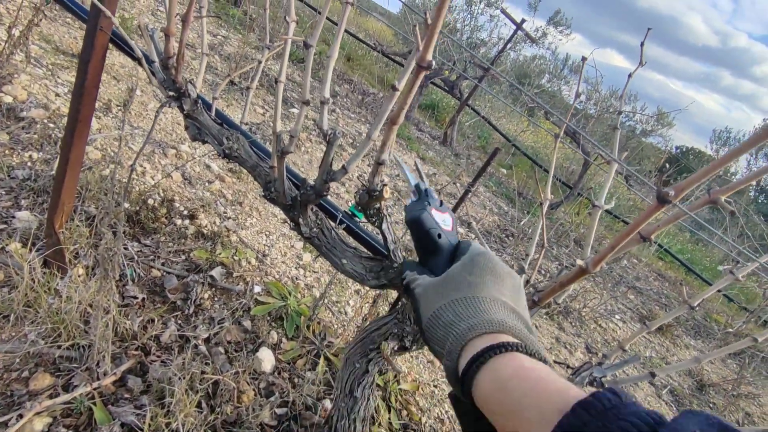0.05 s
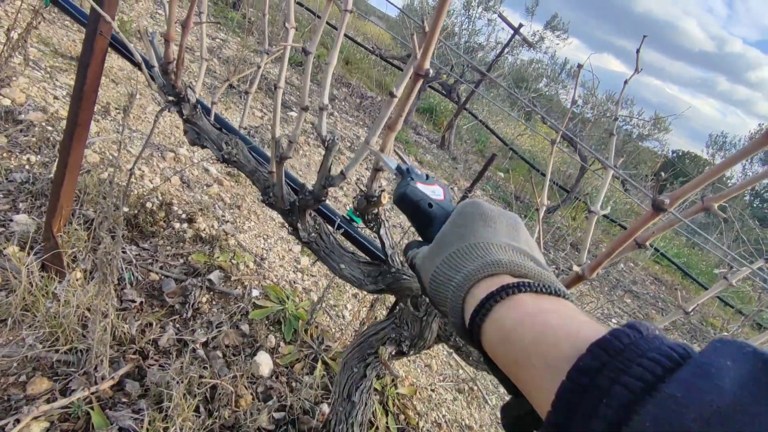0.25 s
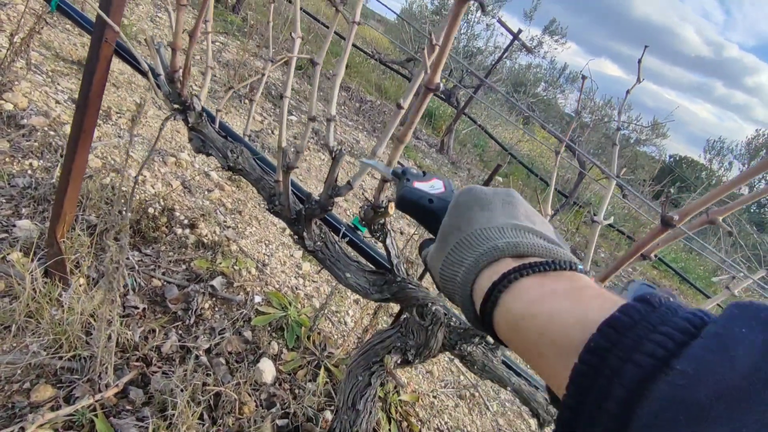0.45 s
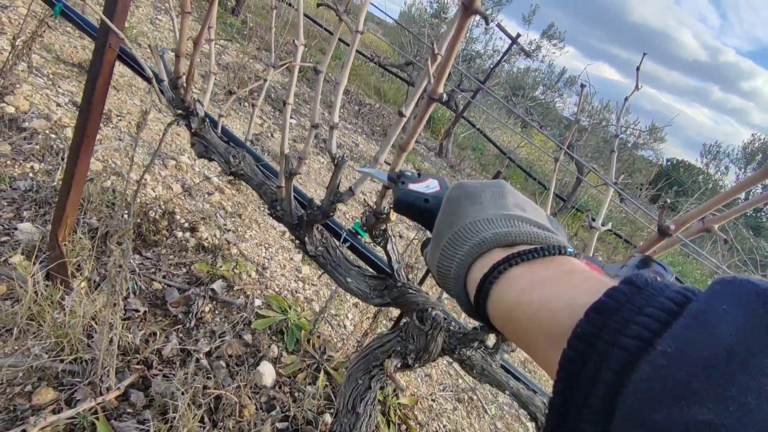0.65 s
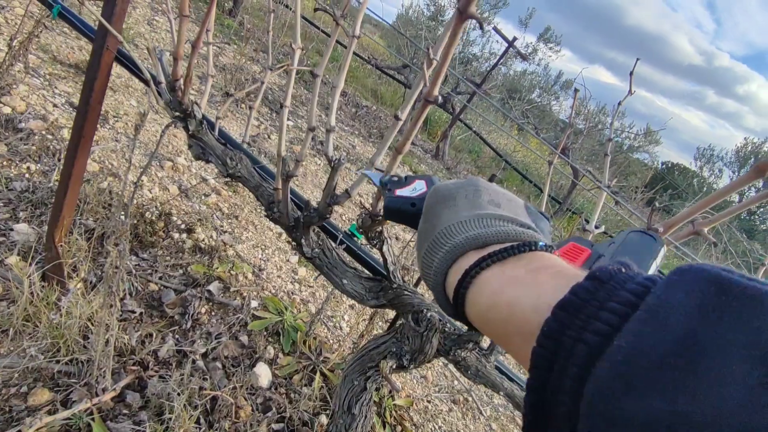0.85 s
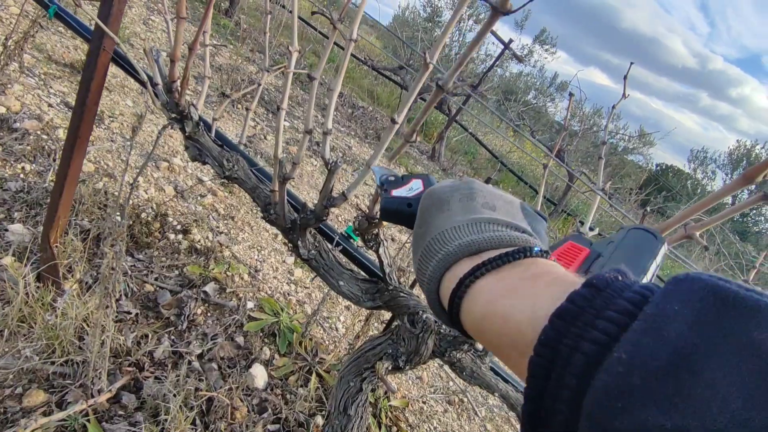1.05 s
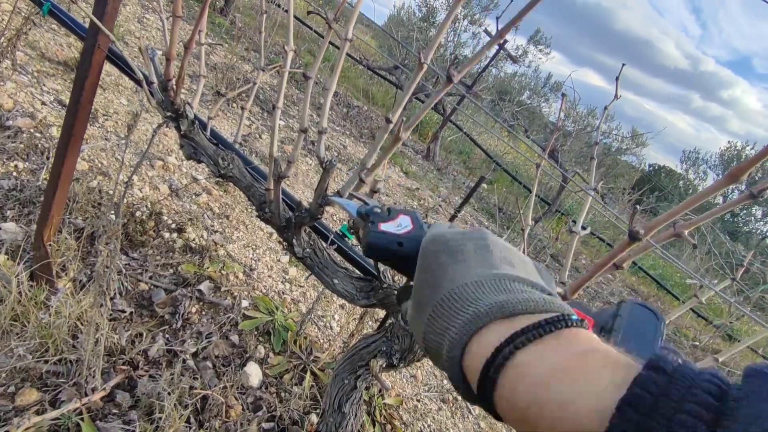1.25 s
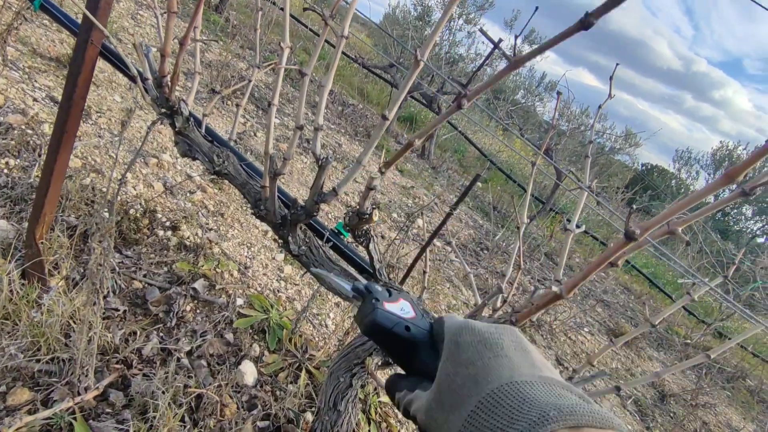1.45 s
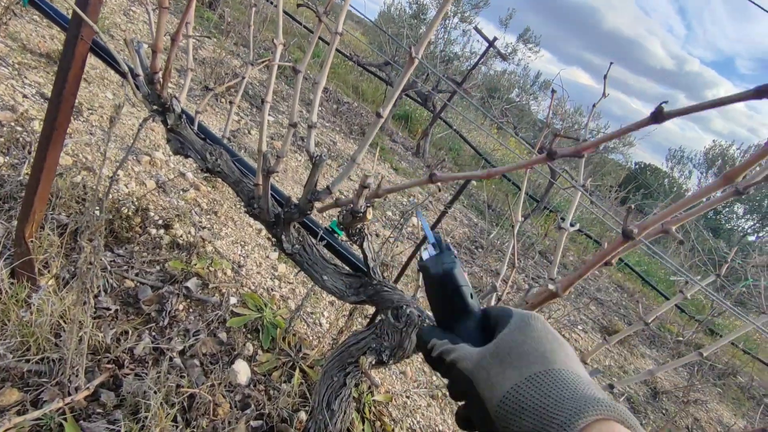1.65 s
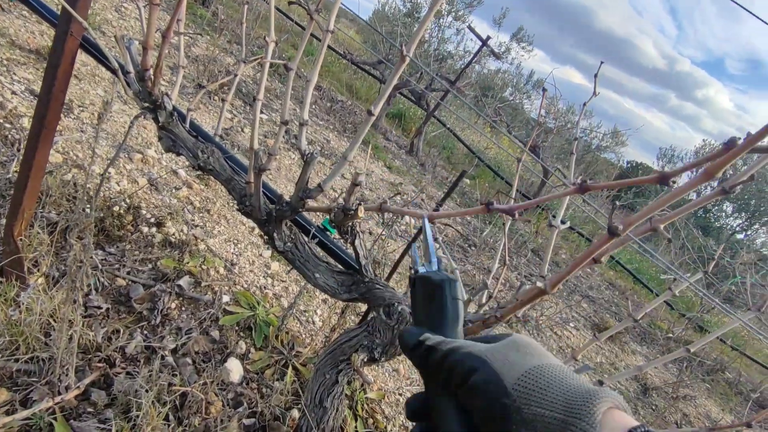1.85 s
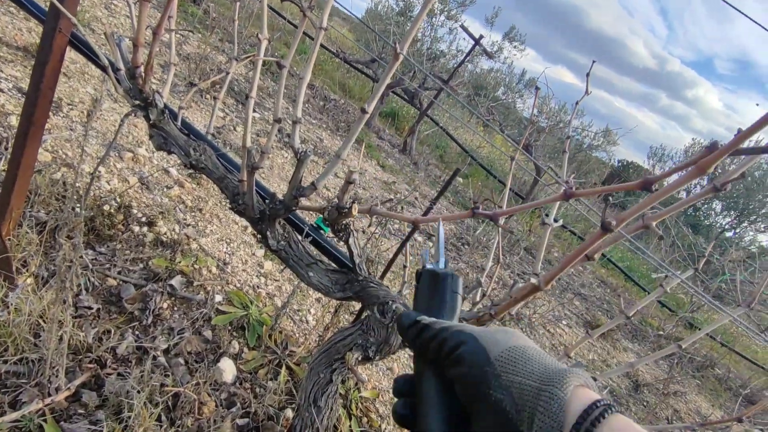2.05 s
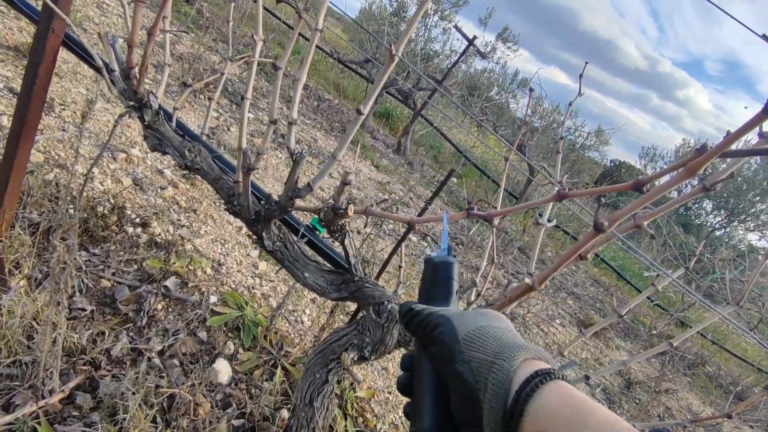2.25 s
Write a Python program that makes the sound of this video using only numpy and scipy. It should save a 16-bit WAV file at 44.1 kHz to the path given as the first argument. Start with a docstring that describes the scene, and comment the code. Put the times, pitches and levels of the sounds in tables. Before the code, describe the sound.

Electric pruning shears make one cut near the microphone after a moment of light outdoor wind and faint, distant birds. The motor whirs, wood snaps, a second whir reopens the blade, and twigs click and rustle softly.

```python
"""First, dry grass swishes, light wind bumps the microphone and birds call far away in a vineyard.
Close by, battery pruning shears start with a clack: the geared motor spins up, labours through a
vine cane until it snaps, then runs back to open the blade. The cut cane ticks and scrapes against
its neighbours, and a sleeve rubs softly as the arm draws back."""
import sys
import numpy as np
from scipy import signal
from scipy.fft import rfft, irfft, next_fast_len
from scipy.io import wavfile
from scipy.ndimage import map_coordinates

SR = 44100
rng = np.random.default_rng(int(sys.argv[2]) if len(sys.argv) > 2 else 0)


def unload_wav(signal):
    """Save mono or channel-first audio to the path in sys.argv[1] as 16-bit WAV at rate SR, clipped to [-1, 1]."""
    wavfile.write(
        sys.argv[1],
        SR,
        np.round(np.clip(np.atleast_2d(signal).T, -1, 1) * 32767).astype(np.int16),
    )


N = 101429
T = np.arange(N) / SR


def amp(db):
    """Turn decibels into a gain."""
    return 10 ** (np.asarray(db) / 20)


def unit(x):
    """Scale to an average strength (rms) of 1."""
    return x / np.sqrt(np.mean(x ** 2) + 1e-20)


def along(points, hz):
    """Read between (f/Hz, value) points on a log frequency axis."""
    f, v = np.transpose(points)
    return np.interp(np.log(hz + 1), np.log(f + 1), v)


def curves(rows):
    """One value per sample for each column after the time."""
    s, *cols = np.transpose(rows)
    return [np.interp(T, s, c) for c in cols]


def wobble(rate):
    """A smooth curve through `rate` random values a second."""
    return map_coordinates(rng.standard_normal(4096), [T * rate], mode="wrap")


def filtered(x, response):
    """Scale each frequency in x by response(hz)."""
    m = next_fast_len(N + 8192)
    return irfft(rfft(x, m) * response(np.fft.rfftfreq(m, 1 / SR)), m)[..., :N]


def pan(db):
    """Left and right gains; a positive pan is louder on the left."""
    return amp(np.array([[.5], [-.5]]) * db)


def noise(spectrum, alike, balance=((100, 0), (10000, 0)), drive=1):
    """Stereo noise of rms 1, roughened by drive, then coloured. Likeness 1 is the same in both ears."""
    def colour(hz):
        turn = np.arccos(np.clip(along(alike, hz), -1, 1)) / 2
        return amp(along(spectrum, hz)) * [np.cos(turn), np.sin(turn)]
    mid, side = filtered(rng.standard_normal((2, N)) * drive, colour)
    return unit(filtered(np.array([mid + side, mid - side]), lambda hz: pan(along(balance, hz))))


def burst(s, length, ring=0.013, attack=0.00068):
    """Rise at time s, hold while the contact lasts, then fall 60 dB in `ring` seconds."""
    rise = np.clip((T - s) / attack, 0, 1)
    return rise * np.exp(-np.log(1000) * np.clip((T - s - length) / ring, 0, 10))


def blow(db, envelope, carrier):
    """A short hit of noise whose energy does not depend on chance."""
    return amp(db) * unit(envelope * carrier) * np.sqrt(np.mean(envelope ** 2))


def tones(orders, angle, rough, shimmer_db=2):
    """Slightly unsteady tones at multiples of the shaft speed."""
    return sum(np.sqrt(2) * amp(db + shimmer_db * wobble(69.9)) * pan(lr)
               * np.sin(k * angle + rough * wobble(160)) for k, db, lr in orders)


# How loud the grass is: t/s, level/dB
GRASS_SWISH = [(0, -70), (.018, -58), (.045, -64), (.095, -77), (.11, -72), (.125, -77.5), (.3, -93),
               (.5, -110)]
# Its tone colour: f/Hz, level/dB
GRASS_COLOUR = [(1500, -12), (4000, -9.5), (6500, -3), (8200, 1), (10000, -17), (13500, -2), (15500, -14)]
def grass():
    """Dry grass gives a brief, grainy swish."""
    grain = amp(3.8 * wobble(1100))
    return amp(curves(GRASS_SWISH)[0]) * noise(GRASS_COLOUR, [(1000, 0.32), (10000, .1)], drive=grain)


# Strength of the gusts: t/s, level/dB
GUSTS = [(0.0, -58), (0.07, -58), (0.1, -42.5), (0.17, -57.5), (0.22, -42.5), (0.27, -36.5), (0.34, -45.5),
         (0.94, -51), (0.99, -46.5), (1.06, -56), (1.5, -53), (1.54, -38.5), (1.66, -53.5), (1.76, -44.5),
         (1.81, -57.5), (1.98, -41), (2.28, -56), (2.3, -78)]
# The side they hit: t/s, pan/dB
GUST_PAN = [(0, 8), (.26, -19.5), (.5, -3), (.8, 1.5), (1.5, 5), (1.62, 9.5), (1.85, -8.5), (2.3, 11.5)]
# Sudden bumps of air: t/s, length/s, level/dB, pan/dB
BUMPS = [(0.209, 0.015, -40.5, -19), (0.249, 0.042, -36.5, -20), (0.614, 0.029, -44, -7.5),
         (0.717, 0.047, -45.5, -2), (1.581, .025, -42.5, 9.5), (1.969, 0.042, -47.5, -1)]
# Tone colours of gusts, bumps and open air: f/Hz, level/dB
GUST_COLOUR = [(20, 2), (45, 3.5), (90, -2), (150, -14.5), (300, -27.5), (500, -51.5), (1200, -77.5),
               (4000, -118)]
BUMP_COLOUR = [(25, -4), (60, -4), (95, 5), (140, -4), (220, -14.5), (330, -25), (600, -42.5), (2000, -74)]
AIR_COLOUR = [(100, 9), (300, 4), (700, -3), (1700, -3.5), (2600, -12), (4500, -17.5), (8000, -22),
              (10000, -27), (15000, -18.5)]
# How alike the open air is in both ears: f/Hz, likeness
AIR_ALIKE = [(100, 1), (400, 0.15), (2000, 0), (6000, 0.12)]
def wind():
    """Gusts bump each microphone opening separately, over the hush of open country."""
    gusts = amp(curves(GUSTS)[0]) * pan(curves(GUST_PAN)[0])
    rumble = noise(GUST_COLOUR, alike=[(60, 0.3), (300, 0.7)])
    bumps = sum(amp(db) * pan(lr) * burst(s, length, ring=0.067, attack=0.0063)
                for s, length, db, lr in BUMPS)
    thud = noise(BUMP_COLOUR, alike=[(60, 0.28), (300, 0.24)])
    hush = amp(-65) * noise(AIR_COLOUR, AIR_ALIKE)
    return gusts * rumble + bumps * thud + hush


# Light clicks: t/s, level/dB, length/s, treble/dB, pan/dB, ring f/Hz
TICKS = [(0.103, -73, 0.00072, 4, 5, 8260), (1.1819, -44.5, 0.0037, -4, -2, 3510),
         (1.5097, -48, 0.0061, -8, -6, 6700), (1.5198, -45.5, 0.007, -11.5, 6, 1766),
         (1.561, -48, 0.0028, -6, -3, 1093), (1.6058, -47, .004, -0.5, 1, 14000),
         (1.7033, -51, 0.012, 7, -1.5, 7100), (1.7158, -44.5, 0.0043, -8, 6, 3100),
         (1.761, -55.5, 0.0038, 7, -1, 6900), (1.7649, -45.5, 0.0035, -15, 8, 2900),
         (1.791, -48, 0.0025, -21, 16, 2400), (1.7987, -51, 0.0028, 3.5, -1, 2030),
         (1.807, -49, 0.0025, -10, -5, 2280), (1.825, -50, 0.0016, -10, -2, 2600),
         (1.8554, -55.5, 0.0024, 1, 1, 9000), (1.9115, -62.5, .001, 3, 10, 3010),
         (1.933, -67.5, .002, 8, -6, 13200), (1.9535, -57, 0.0027, -13, 9, 1050),
         (2.0088, -60.5, 0.00064, 5, 1, 13100), (2.1557, -56.5, 0.0007, -5, -7, 5200),
         (2.212, -57, 0.0027, 3.5, 7.5, 5600)]
# Their tone colour: f/Hz, level/dB
TWIG_COLOUR = [(300, -35), (800, -6.5), (1400, -2), (3200, 1.5), (4600, -4), (6800, 4.5), (10000, -8.5),
               (13000, 1), (15500, -8.5)]
# How alike close sounds are in both ears: f/Hz, likeness
NEAR_ALIKE = [(300, .9), (2000, 0.19), (4500, -0.12), (7000, -0.21), (14000, -0.059)]
def ticks(treble_hz=5250):
    """The trigger and twigs click, each with a short ring."""
    wood = noise(TWIG_COLOUR, NEAR_ALIKE)
    treble = filtered(wood, lambda hz: hz ** 4 / (hz ** 4 + treble_hz ** 4))
    waver = 0.66 * wobble(400)
    sound = np.zeros((2, N))
    for s, db, length, bright, lr, hz in TICKS:
        click = burst(s, length, ring=0.022) * (wood + (amp(bright) - 1) * treble)
        ring = amp(-2) * burst(s, 0, ring=0.021) * np.sin(2 * np.pi * hz * T + waver)
        sound += amp(db) * pan(lr) * (click + ring)
    return sound


def arch(s, length):
    """A smooth hump from 0 to 1 and back, starting at time s."""
    return np.sin(np.pi * np.clip((T - s) / length, 0, 1))


# A small bird's calls: t/s, top f/Hz, level/dB
PEEPS = [(.135, 2970, -75.5), (.52, 3040, -65.5), (.695, 2980, -69)]
def peeps(length_s=0.031, bend=.03):
    """A far bird peeps; each note rises and falls, with a faint octave above it."""
    sound = np.zeros(N)
    for s, hz, db in PEEPS:
        swell = arch(s, length_s)
        phase = 2 * np.pi * np.cumsum(hz * (1 + bend * (swell - 1))) / SR
        sound += amp(db) * swell * (np.sin(phase) + amp(-14) * np.sin(2 * phase))
    return sound


# A harsh bird's calls: t/s, length/s, level/dB
CAWS = [(0.29, 0.11, -65.5), (0.446, 0.12, -62)]
# Their tone colour: f/Hz, level/dB
CAW_COLOUR = [(800, -26), (1400, -9), (1670, 5), (1850, -4), (2150, -7), (2700, -35)]
def caws():
    """Another far bird gives two raspy calls."""
    calls = sum(amp(db) * np.sqrt(np.abs(arch(s, length))) for s, length, db in CAWS)
    return calls * noise(CAW_COLOUR, AIR_ALIKE, drive=amp(2.6 * wobble(200)))


# Gear teeth meeting: t/s, level/dB, length/s
CLACKS = [(0.81, -31.5, 0.0053), (1.224, -31, 0.0049)]
# Their tone colour: f/Hz, level/dB
STEEL_COLOUR = [(300, -32), (900, -19.5), (1400, -3), (2600, 4), (4500, -16), (5600, -11), (6400, 8),
                (7100, 3.5), (8500, -21.5), (10000, -49), (15000, -37.5)]
def clacks():
    """The gears take up their slack each time the motor starts."""
    steel = noise(STEEL_COLOUR, NEAR_ALIKE, balance=[(500, 2.7), (2000, 7), (7000, 2.1)])
    return sum(blow(db, burst(s, length), steel) for s, db, length in CLACKS)


# Motor and gear tones, then high ones that ring the case: multiple of shaft speed, level/dB, pan/dB
WHINE_TONES = [(1, -62, 1), (3, -60, 7), (4, -46.5, 9), (5, -53.5, 8), (8, -70, 8), (10.2, -56, -9),
               (10.5, -63, 7), (12, -64, -12), (12.5, -63, -13)]
CASE_TONES = [(16, -46.5, 6), (17, -53, -13)]
# Tone colours of the housing and the rattling gears: f/Hz, level/dB
HOUSING_COLOUR = [(300, -25), (1000, -1), (1500, 3.5), (2500, 7), (3000, -4.5), (3700, -4.5), (4300, -25),
                  (8000, -40)]
RATTLE_COLOUR = [(200, -14), (500, -18), (850, -9.5), (1100, -14), (1500, -3), (2300, -3.5), (3300, -10),
                 (4300, -7.5), (5000, -10.5), (5700, -17), (6900, -2.5), (7800, -14.5), (9500, -29.5),
                 (12500, -25.5), (15500, -37)]
# The side the shears are heard on: f/Hz, pan/dB
TOOL_PAN = [(200, -1.5), (700, -1.5), (1400, 9), (2400, 10.5), (4400, 1.5), (7000, -1.5), (10000, 3),
            (15000, 1.5)]
FREE_SPEED_HZ, CASE_HZ, CASE_WIDTH_HZ = 404, 6530, 410
MESH_PER_TURN, PULSE_DEPTH = 10.5, 0.26  # tooth contacts per turn; the rattle pulses once a turn
def motor(stroke):
    """One run of the motor whines and rattles. Returns the sound and the shaft angle."""
    speed, level = curves(stroke)
    angle = 2 * np.pi * np.cumsum(speed * (1 + .001 * wobble(90))) / SR
    whine = tones(WHINE_TONES, angle, rough=0.05) * (speed / FREE_SPEED_HZ) ** 3.6  # louder when fast
    # High tones sing only near the pitch at which the case rings.
    high = tones(CASE_TONES, angle, rough=.1)
    sing = filtered(high, lambda hz: 1 / (1 + (2 * (hz - CASE_HZ) / CASE_WIDTH_HZ) ** 2))
    # The buzz of the teeth swells as it sweeps through the housing's ring.
    mesh_hz = MESH_PER_TURN * speed
    mesh_gain = amp(-47 + along(HOUSING_COLOUR, mesh_hz) + 3.3 * wobble(300))
    buzz = np.sqrt(2) * np.sin(MESH_PER_TURN * angle + 1.2 * wobble(600))
    mesh = mesh_gain * pan(along(TOOL_PAN, mesh_hz)) * buzz
    pulsing = (1 + PULSE_DEPTH * np.cos(angle)) * amp(2.5 * wobble(500))
    rattle = amp(-43.5) * noise(RATTLE_COLOUR, NEAR_ALIKE, TOOL_PAN, pulsing)
    start, end = stroke[0][0], stroke[-1][0]
    return (whine + sing + mesh + rattle) * amp(level) * burst(start, end - start), angle


# The motor's two runs: t/s, shaft speed/Hz, level/dB
CLOSING_RUN = [(.812, 60, -10), (.822, 140.1, -8), (.833, 218.5, -3.5), (.857, 360.4, -1),
               (.873, 396.6, -1), (.895, 399.1, -1), (.918, 370.1, -0.5), (.942, 358.2, -3.5),
               (.968, 351.8, -2.5), (.985, 217.6, -25), (1.02, 80.5, -28)]
OPENING_RUN = [(1.226, 69.26, -8), (1.238, 149.9, -2), (1.253, 243.5, 2.5), (1.275, 366, 4),
               (1.292, 398.4, 1), (1.315, 403.4, 0.5), (1.373, 406.8, -0.5), (1.382, 356.8, 0.5),
               (1.395, 165, -9), (1.415, 106, -14.5), (1.445, 61, -24)]
def shears():
    """The motor drives the blade through the cane, then opens it again."""
    closing, angle = motor(CLOSING_RUN)
    opening, _ = motor(OPENING_RUN)
    return closing + cut(angle) + opening


# How hard the blade presses: t/s, level/dB
BLADE_FORCE = [(.875, -50), (.89, -20), (.898, -14), (.91, -10), (.92, 1), (.945, 0), (.966, -4.5),
               (.974, -1), (.985, -16), (1.01, -48)]
# Tones of the straining gears: multiple of shaft speed, level/dB, pan/dB
GROWL_TONES = [(2.42, -46, 2.5), (3.96, -46, 7), (5.5, -52.5, 4), (6.25, -49, 9), (6.8, -53, 9),
               (7.48, -47.5, -2), (10.5, -58, -15)]
# Cracks before the cane gives way: t/s, level/dB, length/s
CRACKS = [(.8955, -40, 0.0051), (0.91, -35, 0.0015), (0.9562, -28, .003), (0.964, -29.5, 0.0026)]
# Tone colours of grinding gears, splitting wood and the snap: f/Hz, level/dB
GRIND_COLOUR = [(150, -13), (500, -11.5), (900, -7), (1400, -2.5), (2600, -1), (3300, -9), (3900, 8.5),
                (4700, -22), (9000, -20), (15000, -48)]
FIBRE_COLOUR = [(500, -47), (2000, 16), (5500, 0), (7400, 8.5), (10000, -5), (12000, 7), (15500, -2)]
SNAP_COLOUR = [(100, -23), (180, -18), (350, -21), (700, -7.5), (1050, -11.5), (1300, 4), (1650, -3),
               (2900, -1.5), (4500, -9.5), (8000, -11), (15000, -15.5)]
def cut(angle):
    """Under load the gears growl and wood fibres split, until the cane snaps."""
    pressing = (T > BLADE_FORCE[0][0]) * (T < BLADE_FORCE[-1][0])
    force = amp(curves(BLADE_FORCE)[0]) * pressing
    growl = tones(GROWL_TONES, angle, rough=0.38)
    grind = amp(-38) * noise(GRIND_COLOUR, NEAR_ALIKE, TOOL_PAN, 1 + PULSE_DEPTH * np.cos(angle))
    crunch = amp(-39.5) * noise(FIBRE_COLOUR, NEAR_ALIKE, TOOL_PAN, amp(2.1 * wobble(1200)))
    fibres = noise(FIBRE_COLOUR, NEAR_ALIKE, TOOL_PAN)
    cracks = fibres * sum(amp(db) * burst(s, length) for s, db, length in CRACKS)
    breaking = burst(s=.9675, length=0.0036, ring=0.012)
    snap = blow(-23.5, breaking, noise(SNAP_COLOUR, NEAR_ALIKE, TOOL_PAN))
    return force * (growl + grind + crunch) + cracks + snap


# Dull knocks: t/s, level/dB, f/Hz
KNOCKS = [(0.973, -38.5, 197), (.998, -46.5, 306), (1.558, -48.5, 483), (1.612, -47, 297),
          (1.79, -40.5, 314), (1.8, -40.5, 278)]
def knocks():
    """Hand and cane knock, each time with one low note that dies fast."""
    return sum(amp(db) * burst(s, 0, ring=0.052) * np.sin(2 * np.pi * hz * (T - s))
               for s, db, hz in KNOCKS)


# How loud the scraping cane is: t/s, level/dB
CANE_SCRAPE = [(.98, -95), (1.05, -65.5), (1.42, -70), (1.48, -54.5), (1.5, -79), (1.53, -62.5),
               (1.55, -50.5), (1.572, -50), (1.6, -56.5), (1.68, -64.5), (1.785, -86), (1.803, -45),
               (1.84, -53), (1.89, -63.5), (2.02, -70.5), (2.08, -66.5), (2.3, -71)]
# Its tone colour: f/Hz, level/dB
SCRAPE_COLOUR = [(200, 24), (700, 2.5), (1800, 6), (3200, 1), (5000, -3), (7000, -2.5), (10000, -18.5),
                 (13000, -2.5), (15500, -25)]
def scrape():
    """The cut cane brushes past the vine with a grainy rustle."""
    grain = amp(2.9 * wobble(700) + 1.23 * wobble(59.6))
    return amp(curves(CANE_SCRAPE)[0]) * noise(SCRAPE_COLOUR, AIR_ALIKE, drive=grain)


# How loud the sleeve is: t/s, level/dB
SLEEVE_RUB = [(1.4, -104), (1.55, -64), (1.75, -68.5), (1.95, -66.5), (2.1, -65.5), (2.22, -64.5),
              (2.3, -71.5)]
# Its tone colour: f/Hz, level/dB
CLOTH_COLOUR = [(200, 0.5), (600, -1), (2000, -2.5), (3200, -1), (4500, -12), (8000, -16), (15000, -20)]
def sleeve():
    """Cloth rubs softly as the arm draws back."""
    return amp(curves(SLEEVE_RUB)[0]) * noise(CLOTH_COLOUR, AIR_ALIKE, drive=amp(1.7 * wobble(300)))


def echo(x, fade_s=0.12, level_db=-15):
    """The ground and vines scatter the sound into a short, weak tail."""
    t = T[:SR // 2]
    tail = rng.standard_normal((2, len(t))) * np.exp(-np.log(1000) * t / fade_s) * (t > .004)
    wet = signal.fftconvolve(x, tail / np.linalg.norm(tail[0]), axes=1)[:, :N]
    return filtered(wet, lambda hz: amp(level_db + along([(1500, 0), (6000, 2), (15000, -6)], hz)))


def scene():
    """Add up all the sounds; only the wind has no echo."""
    sounds = grass() + ticks() + peeps() + caws() + clacks() + shears() + knocks() + scrape() + sleeve()
    return sounds + echo(sounds) + wind()


def record(dry):
    """Remove the highest treble, above 15800 Hz."""
    return filtered(dry, lambda hz: hz < 15800)


dry = scene()
out = record(dry)
unload_wav(out)
```